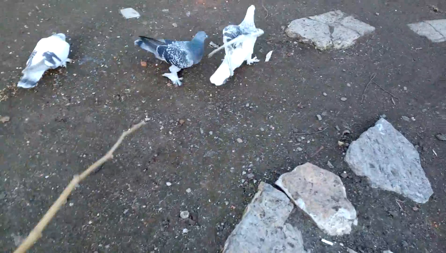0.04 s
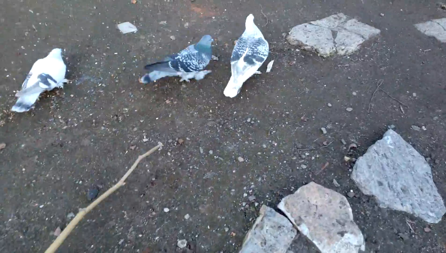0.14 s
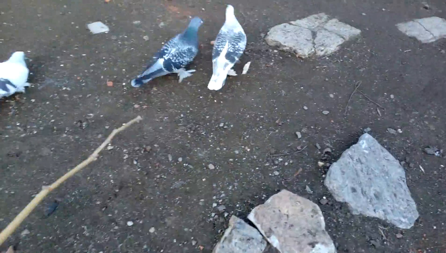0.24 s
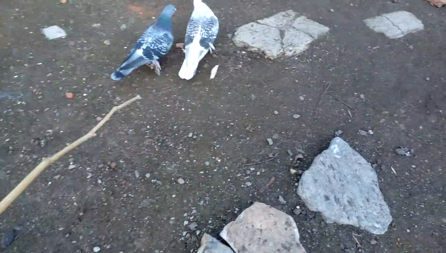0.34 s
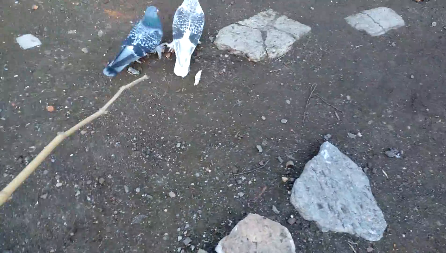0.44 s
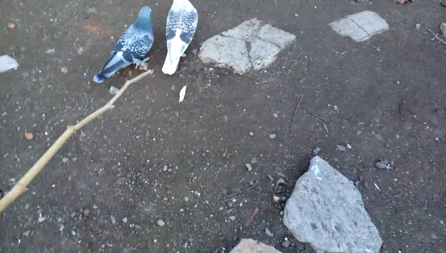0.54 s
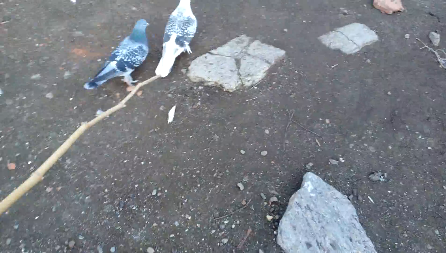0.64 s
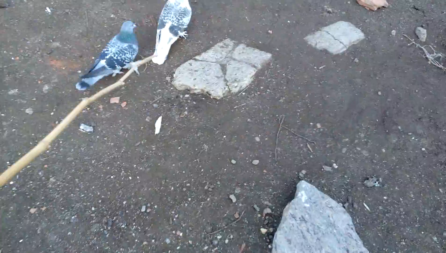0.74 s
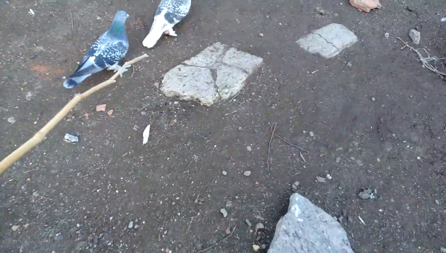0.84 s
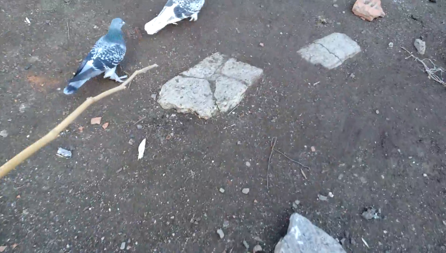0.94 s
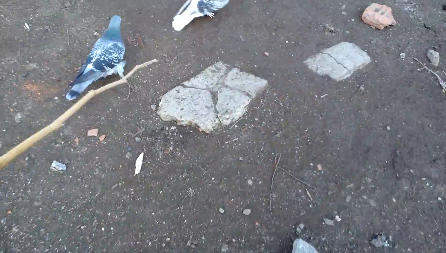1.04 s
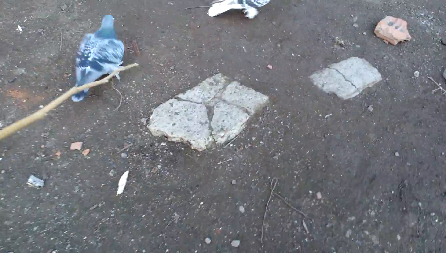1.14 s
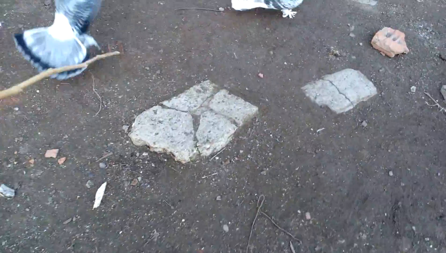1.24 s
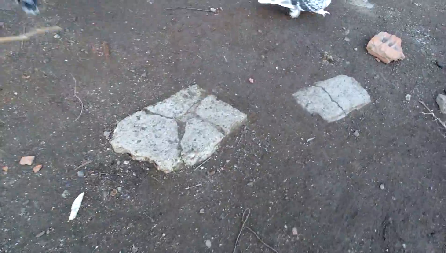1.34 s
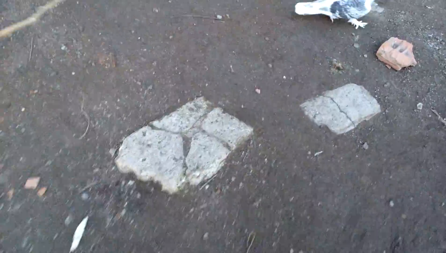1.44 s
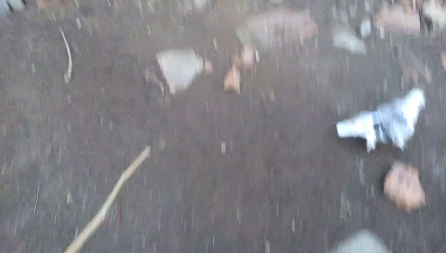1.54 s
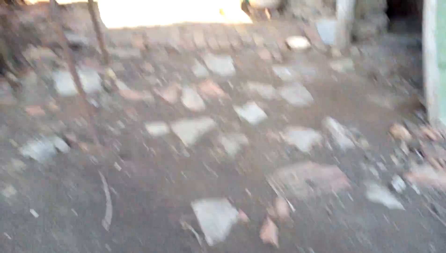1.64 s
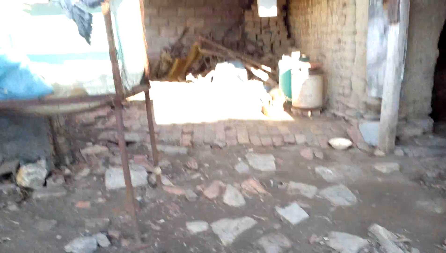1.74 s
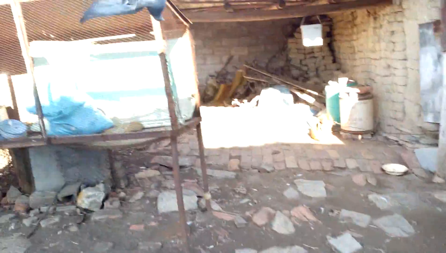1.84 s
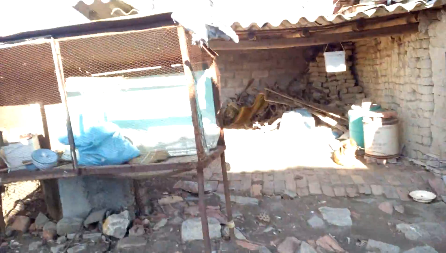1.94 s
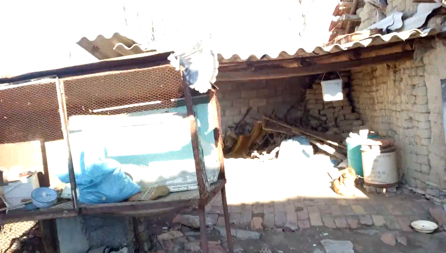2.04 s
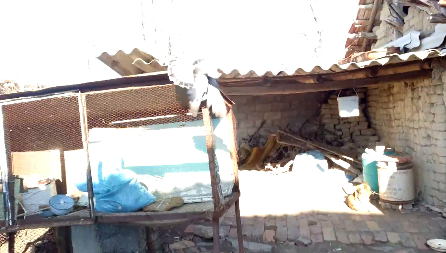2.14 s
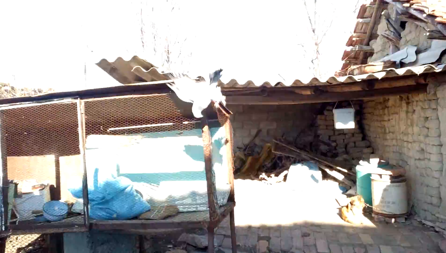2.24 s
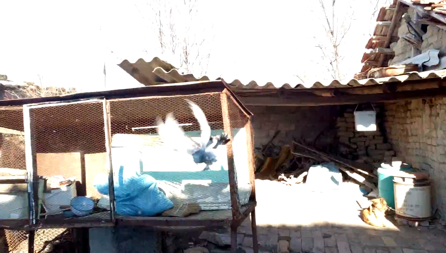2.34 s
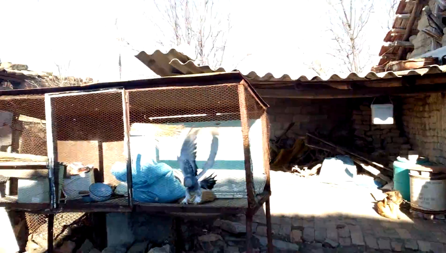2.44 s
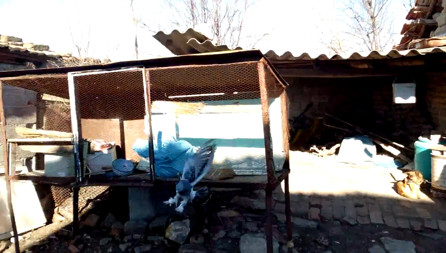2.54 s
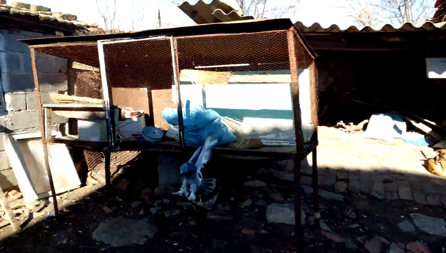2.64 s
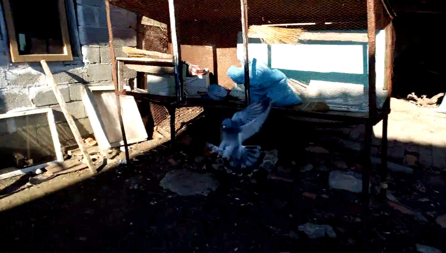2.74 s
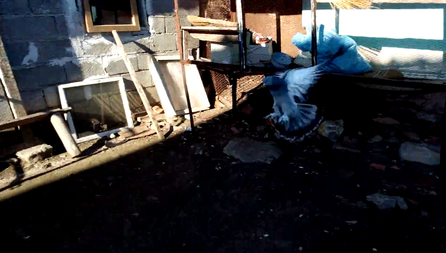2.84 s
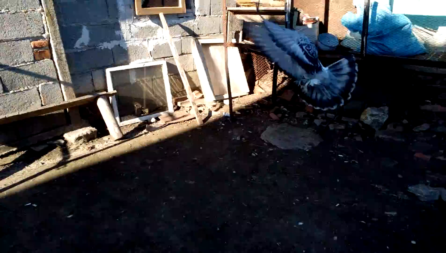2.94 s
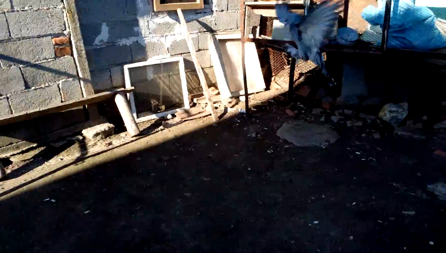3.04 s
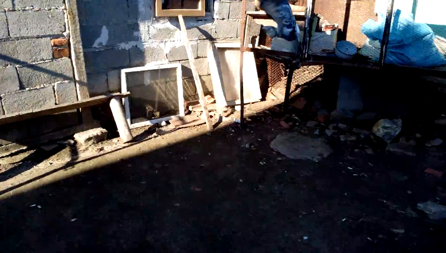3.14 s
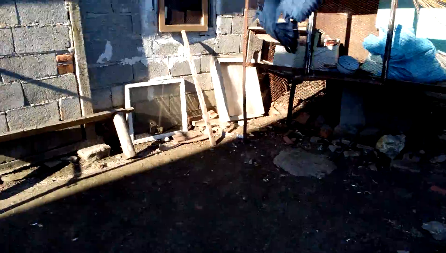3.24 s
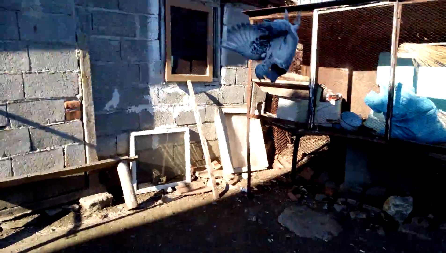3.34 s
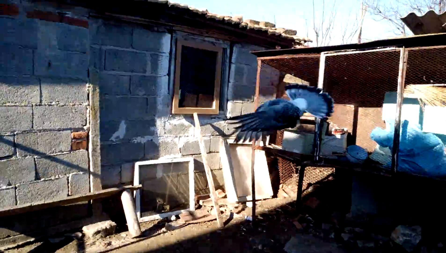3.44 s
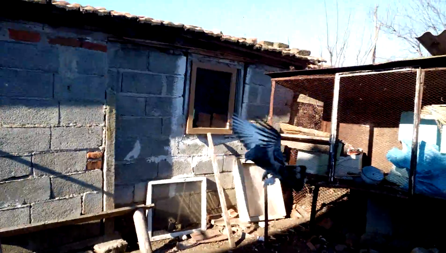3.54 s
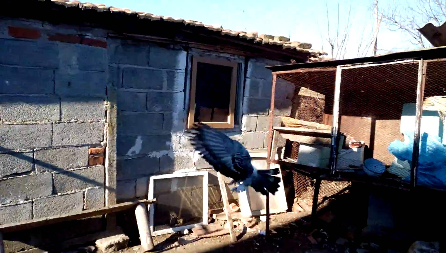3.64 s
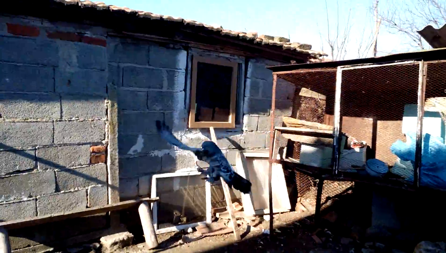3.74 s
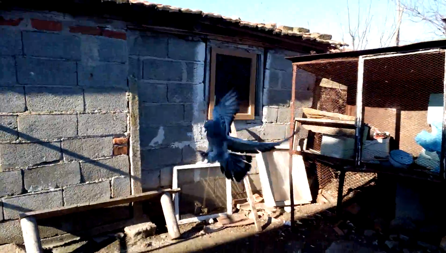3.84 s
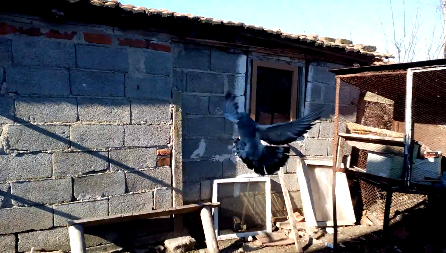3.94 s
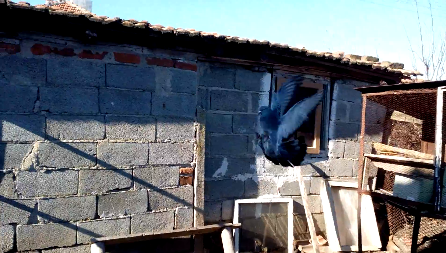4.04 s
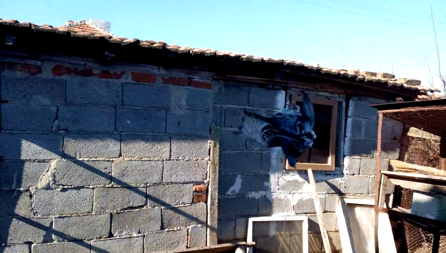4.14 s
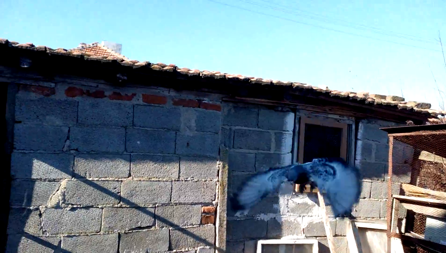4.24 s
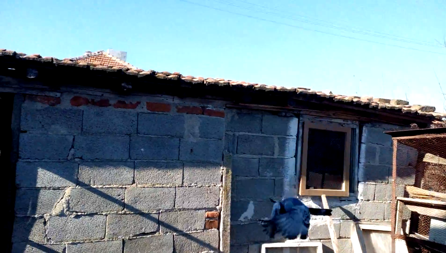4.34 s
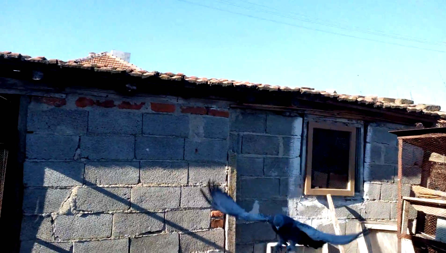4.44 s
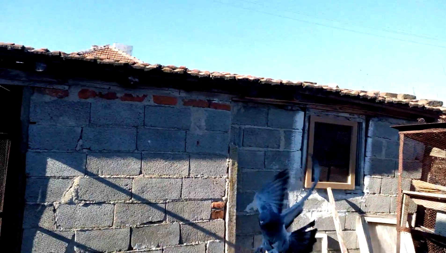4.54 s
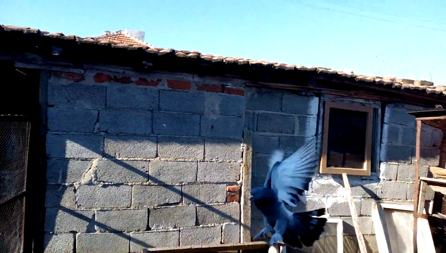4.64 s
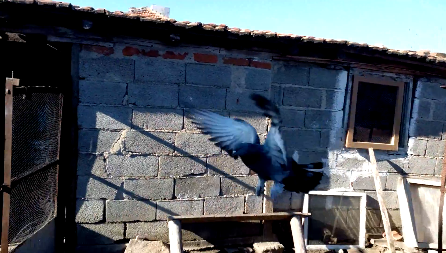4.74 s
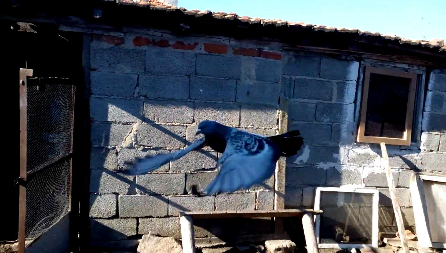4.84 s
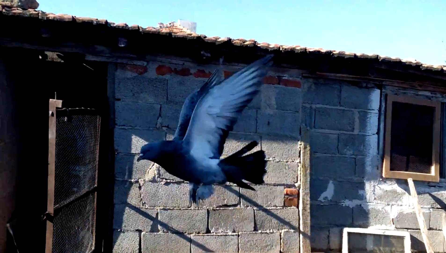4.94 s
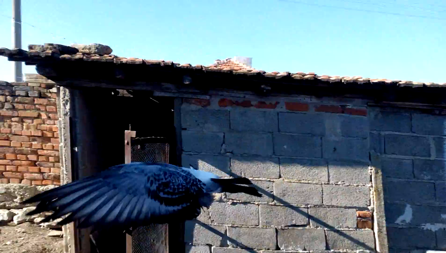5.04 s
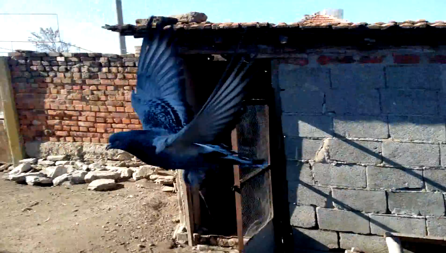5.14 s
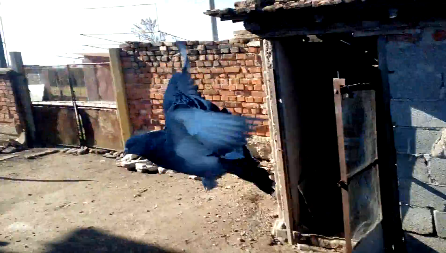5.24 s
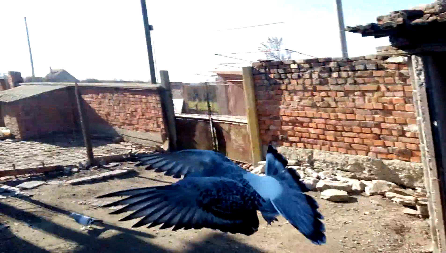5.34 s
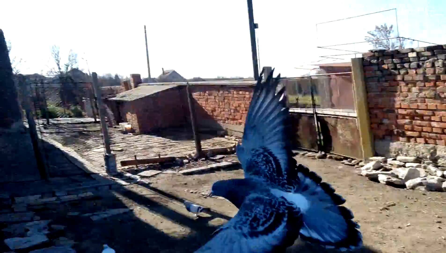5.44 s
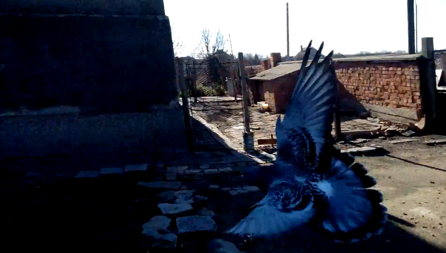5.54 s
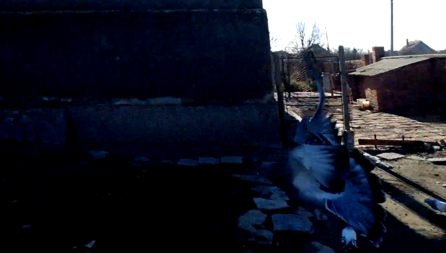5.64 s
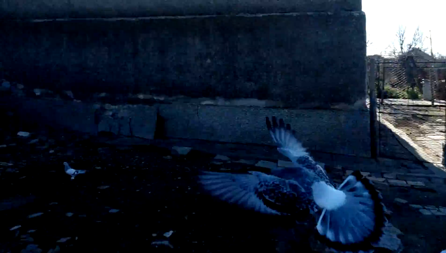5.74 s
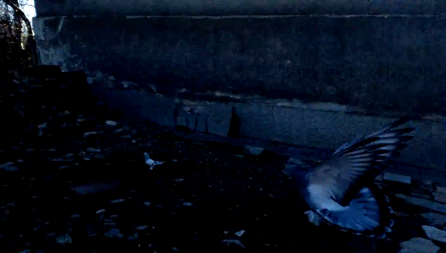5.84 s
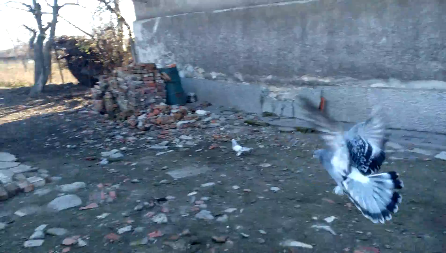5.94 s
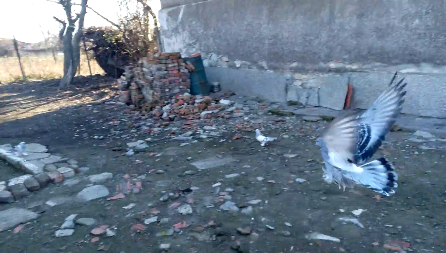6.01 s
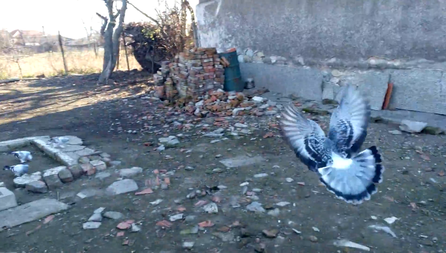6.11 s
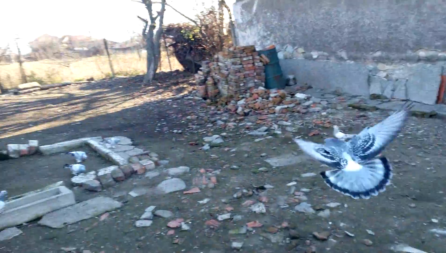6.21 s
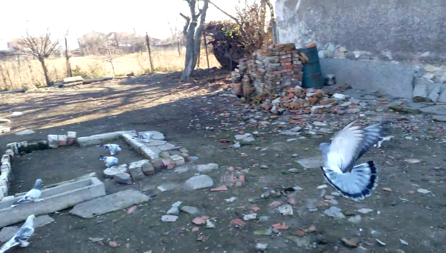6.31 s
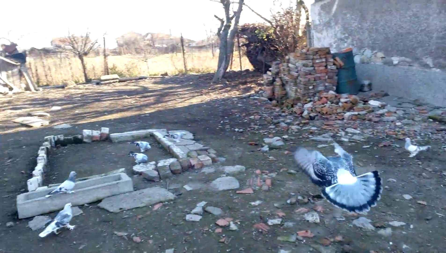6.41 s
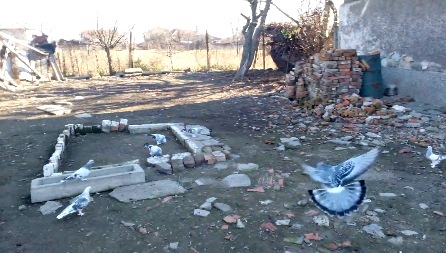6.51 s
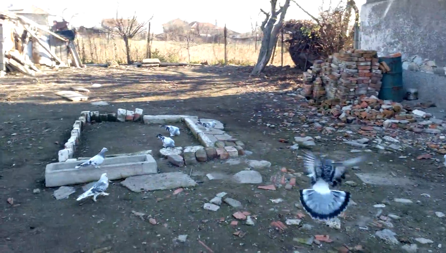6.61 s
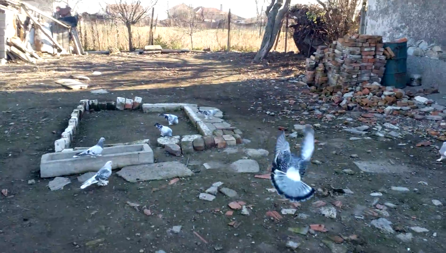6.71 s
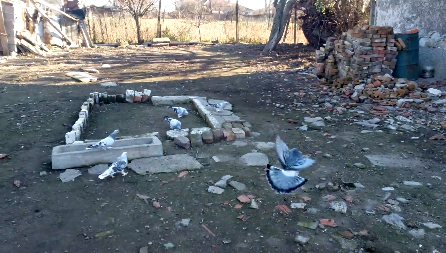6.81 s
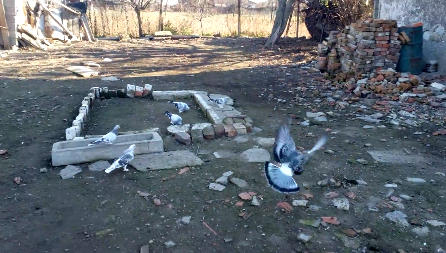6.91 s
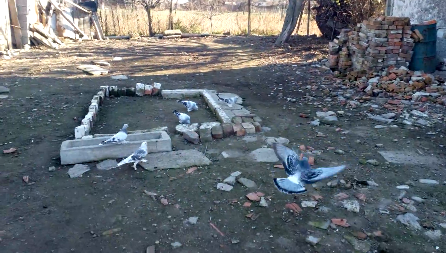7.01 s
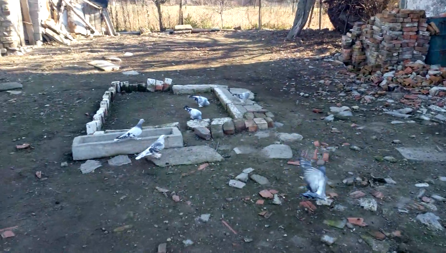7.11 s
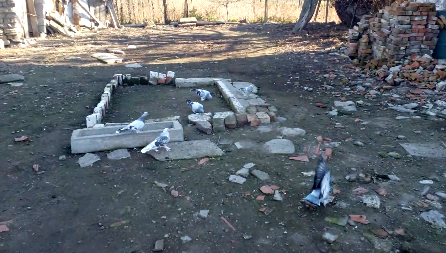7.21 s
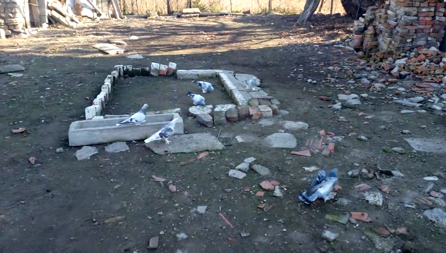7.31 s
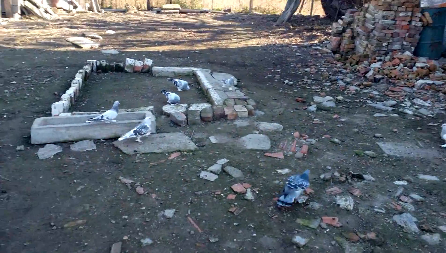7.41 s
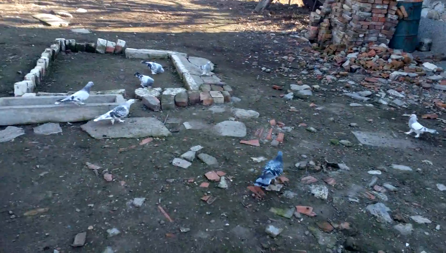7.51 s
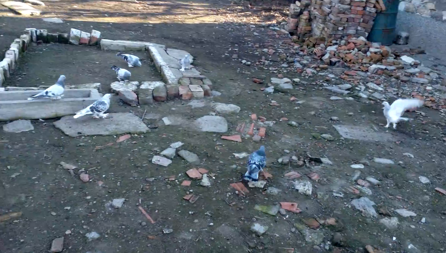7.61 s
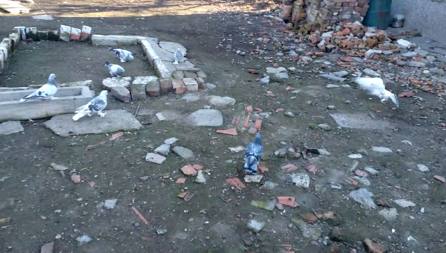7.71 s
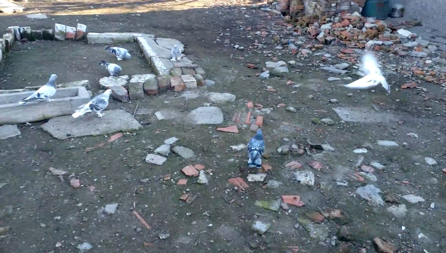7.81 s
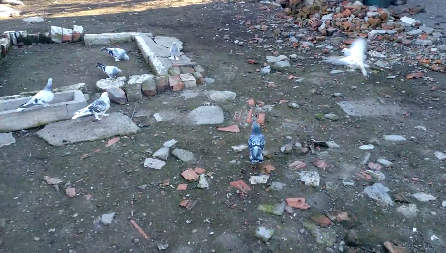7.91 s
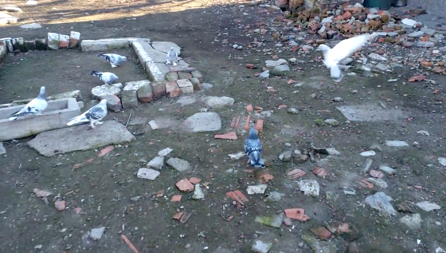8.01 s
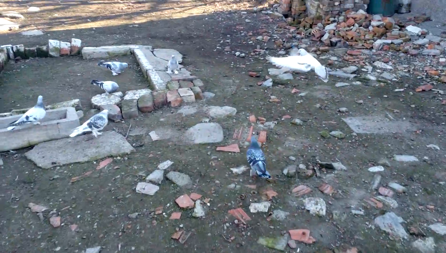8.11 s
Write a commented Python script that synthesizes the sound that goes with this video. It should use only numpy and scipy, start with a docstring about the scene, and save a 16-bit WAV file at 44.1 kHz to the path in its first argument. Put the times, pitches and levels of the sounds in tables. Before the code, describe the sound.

In a quiet dirt yard, low wind thumps hit the microphone while a few soft wing brushes stir. A pigeon takes off close by with a burst of crisp, rapid wing claps and feathery swishing, flaps on in steady beats, then brakes with faint, rough, pulsing feather whistles. A few small dry taps fall midway, and gusts return near the end.

```python
"""A pigeon takes off close by, flies nearer and farther and brakes to land, its wings clapping: bursts of noise.
Air swishes and whooshes through the feathers as shaped noise; the braking feathers whistle as rough, bent tones.
The place is a quiet dirt yard: the ground returns smeared echoes of the claps, the walls a short diffuse tail.
A few dry taps and faint treble ticks are heard. Gusts thump on the microphone, mostly on its left port:
rumble and pressure pushes."""
import sys
import numpy as np
from scipy import signal
from scipy.fft import rfft, irfft, next_fast_len
from scipy.io import wavfile
from scipy.ndimage import uniform_filter1d, map_coordinates

SR = 44100
rng = np.random.default_rng(int(sys.argv[2]) if len(sys.argv) > 2 else 0)


def transcribe(signal):
    """Save signal, clipped to [-1, 1], as a 16-bit WAV file at the path in sys.argv[1]."""
    frames = np.atleast_2d(signal).T
    limited = np.clip(frames, -1, 1)
    pcm = np.round(limited * 32767).astype(np.int16)
    wavfile.write(sys.argv[1], SR, pcm)


N = 360127

# quiet yard, spectrum: (frequency [Hz], density [dB])
YARD_COLOUR = [(30, -25), (60, 8.5), (330, 1.5), (700, -13.5), (1200, -9.5), (2300, -13), (4000, -39),
               (5500, -19), (10000, -27.5), (16000, -55)]
# diffuse tail of the walls: (frequency [Hz], time to fall 60 dB [s])
WALL_DECAY = [(200, 0.08), (1500, 0.19), (5000, 0.21), (12000, 0.2)]

# microphone ports, colour: (frequency [Hz], left minus right [dB])
PORT_BALANCE = [(100, 4.5), (600, 4), (1200, 1.5), (2300, -9.5), (3800, -3.5), (5200, -6), (7000, -6.5),
                (9000, -2), (12000, -4.5)]
# likeness of the two ports for sounds of the yard: (frequency [Hz], likeness [0 to 1])
PORT_LIKENESS = [(100, 0.99), (700, 1), (2000, 0.59), (5000, 0.26), (12000, 0.14)]
TOP_HZ = 16000  # band limit of the recorder

# light breeze between gusts: (time [s], buffet level [dB])
BREEZE = [(0, -89), (.4, -58), (.65, -45.5), (1.1, -51.5), (1.6, -45), (2.1, -51), (2.7, -42.5), (3.2, -51),
          (4.4, -51), (5.5, -56), (5.75, -40), (6.1, -45.5), (6.8, -39), (7.1, -52.5), (7.6, -40),
          (8.1, -47.5)]
# gusts: (start [s], length [s], level before the gust gain [dB], sharpness setting of their eddies [dB])
GUSTS = [(0.25, .04, -47.5, -18), (0.65, 0.12, -31, -17), (0.85, 0.085, -34, -48),
         (0.995, 0.022, -33.5, -42), (1.185, 0.065, -29, -18), (1.25, .085, -32.5, -25),
         (1.425, 0.25, -28, -18), (1.68, 0.26, -32.5, -11), (2.25, 0.062, -36, -11),
         (5.66, 0.053, -26, -35), (5.88, 0.116, -37.5, -28), (6.72, 0.2, -42.5, -28),
         (7.32, 0.071, -32, -28), (7.385, .3, -24, -16.5), (7.7, 0.24, -35.5, -45),
         (8.14, 0.013, -25.5, -21)]
# hardest eddies at the microphone: (time [s], peak before the eddy gain [dB], sharpness setting of the front [dB])
HARD_EDDIES = [(0.714, -18, -20), (0.856, -16, -56), (1.186, -10, -39), (1.205, -6.5, -21),
               (1.238, -10, -15), (1.57, -12.5, -11), (1.653, -14.5, -20), (1.842, -13, -33),
               (2.015, -11.5, -50), (5.665, -13.5, -42), (5.698, -14, -39), (6.739, -15.5, -10),
               (6.861, -14, -24), (7.396, -9, -24), (7.482, -7.5, -11), (7.497, -8.5, -13),
               (7.54, -4.5, -13.5), (7.64, -12.5, -18), (7.902, -13, -26.5), (8.157, -1, -21)]
# side on which the wind strikes: (time [s], left minus right gain [dB])
WIND_SIDE = [(0, 16), (.6, -11), (1.2, 16.5), (1.7, 8.5), (2.6, 1.5), (5.3, 4.5), (5.7, 11), (6.2, -10),
             (6.8, 0.5), (7.4, 11.5), (8.1, 9.5)]
# wind rumble, spectrum: (frequency [Hz], density [dB])
BUFFET_COLOUR = [(25, -61), (45, -23), (80, 1), (150, -2), (250, -9.5), (400, -24.5), (800, -37.5),
                 (2000, -56), (6000, -100)]
GUST_ATTACK_S, GUST_RELEASE_S = 0.0082, 0.01  # rise and decay constant of a gust
# lesser eddies: number per second, peak over the gust's listed level, random scatter
EDDY_RATE, EDDY_OVER_DB, EDDY_SPREAD_DB = 70, 5, 4

# small dry taps: (time [s], peak [dB])
TAPS = [(4.416, -26.5), (5.255, -20), (5.331, -28), (5.39, -29)]
# tap, spectrum: (frequency [Hz], level [dB])
TAP_COLOUR = [(60, 2), (300, 4.5), (900, -3.5), (1800, -6.5), (2800, -29), (8000, -52)]

# air through the wings, nearer and farther: (time [s], wing swish before gain [dB], feather rustle before gain [dB])
AIR = [(1.47, -35.5, -52), (1.6, -39.5, -48), (2.2, -45, -53.5), (2.79, -41, -47.5), (3.17, -45.5, -65.5),
       (3.61, -48, -59.5), (3.94, -44.5, -58), (4.47, -49, -58.5), (4.73, -44, -58), (5.29, -58, -59),
       (5.82, -48.5, -60), (6.29, -61, -66.5), (6.71, -52.5, -64.5), (7.12, -59, -64.5), (7.3, -57.5, -65)]
# wing swish, spectrum: (frequency [Hz], density [dB])
SWISH_COLOUR = [(80, -3), (200, -1), (450, 3.5), (900, 0.5), (1500, -5), (2300, -4), (3200, -28),
                (6000, -30.5), (12000, -44)]
# feather rustle, spectrum: (frequency [Hz], density [dB])
RUSTLE_COLOUR = [(1200, -3), (2500, 1), (4800, 0), (7000, -6.5), (8500, -20.5), (11000, -20),
                 (12500, -38.5), (16000, -36)]
SWISH_GAIN_DB, RUSTLE_GAIN_DB = -.5, 2
REST_SWISH_DB, REST_RUSTLE_DB = -62.5, -64.5  # birds stirring on the ground
SWISH_LUMPS_DB = 2.2  # chance swelling of the swish
DOWNSTROKE_LAG_S, STROKE_WIDTH_S = .052, .03  # clap to fastest downstroke, half length of its swell
# level over the listed wing swish, usual pitch, random scatter of the pitch in octaves
WHOOSH_DB, WHOOSH_HZ, WHOOSH_SPREAD_OCT = -7, 725, 0.44
FULL_STROKE_DB = -30  # claps listed above this open a full downstroke

# feather whistles, one per braking stroke: (time at the middle [s], level [dB], pitch setting [Hz])
WHISTLES = [(5.96, -42.5, 775), (6.12, -44, 727), (6.275, -47, 676), (6.45, -42, 743), (6.62, -43.5, 745),
            (6.77, -48, 757), (6.915, -45.5, 773), (7.09, -46, 776), (7.9, -48.5, 760), (8.03, -47.5, 734)]
# soft wing brushes and scuffles: (time [s], relative level [dB])
BRUSHES = [(0.252, -32.5), (0.288, -36), (0.333, -37.5), (0.712, -36.5), (0.794, -43), (1.754, -28),
           (2.065, -29), (2.245, -28), (2.278, -27.5), (2.606, -22.5), (2.733, -27), (3.644, -33.5),
           (4.263, -32), (5.609, -38), (5.8, -35.5), (6.344, -42), (6.529, -38.5), (6.712, -39.5),
           (7.845, -44.5)]
BRUSH_HISS_DB = -11.5  # a brush is duller than a clap

# wing claps, and a few faint treble ticks of the same burst shape (at 0.42, 6.345 and 6.44 s):
# (time [s], relative level [dB], contact time before widening [s])
CLAPS = [(0.42, -57, 0.0018), (0.6796, -44.5, 0.0026), (1.4174, -37.5, 0.0022), (1.4663, -27.5, 0.0016),
         (1.5108, -19, 0.0027), (1.5675, -25.5, 0.00086), (1.6094, -18.5, 0.0042), (1.7106, -20.5, 0.0039),
         (1.818, -28, 0.0049), (1.8828, -30.5, 0.0025), (1.9326, -26.5, 0.0045), (1.9806, -24, 0.0045),
         (1.995, -28, .0053), (2.1624, -30, 0.0061), (2.3038, -31, 0.0038), (2.3636, -33.5, 0.0073),
         (2.4701, -29, 0.0044), (2.534, -42.5, 0.0019), (2.572, -25, 0.0064), (2.6704, -22.5, 0.0054),
         (2.684, -26, 0.002), (2.7694, -18, 0.006), (2.872, -23.5, 0.0038), (2.937, -33.5, 0.0017),
         (2.974, -21.5, 0.0071), (3.0866, -21, 0.0036), (3.2134, -29, 0.0075), (3.3234, -28, .0041),
         (3.4395, -30, 0.0045), (3.485, -28.5, 0.0019), (3.7066, -29, 0.011), (3.771, -31.5, 0.003),
         (3.8114, -19, 0.0042), (3.9195, -18.5, 0.0077), (4.0365, -25, 0.008), (4.1527, -22.5, 0.0069),
         (4.3078, -31, 0.0037), (4.5333, -20.5, 0.0044), (4.6429, -22.5, .0049), (4.7583, -25.5, 0.0063),
         (4.874, -23.5, 0.0081), (5.0113, -23, 0.0057), (6.345, -51, 0.0042), (6.44, -52, 0.0033),
         (6.851, -36.5, 0.0036), (7.007, -43, 0.0027), (7.174, -38, 0.00072), (8.107, -48, 0.0069)]
# clap before its thud and hiss are weighted, spectrum: (frequency [Hz], density [dB])
CLAP_COLOUR = [(60, -4), (180, 4.5), (600, 4), (1100, 4.5), (1500, 0.5), (2250, 3.5), (2900, -3.5),
               (4800, 1.5), (7000, -4), (9000, -16.5), (12000, -25.5), (16000, -45)]
# colour of the early, near-ground claps, a dip at 1.5 kHz and a peak at 2.25 kHz: (frequency [Hz], gain [dB])
NEAR_GROUND_COLOUR = [(1100, 1), (1500, -8.5), (2250, 2.5), (2900, 1)]
LEAD_IN = .012  # seconds of wing-tip touch ahead of the clap
# a clap's colour follows its strength: a hard one is mostly crack, a soft one mostly air thud and feather hiss
USUAL_CLAP_DB = -26
THUD_DB, THUD_FALL = -3.5, 0.48  # thud of a usual clap, and its fall per dB of strength
HISS_DB, HISS_FALL = -5.5, 0.14  # the same for the hiss
TURNED_HISS_DB = -2.5  # change of the hiss once the bird has turned towards the listener
LOW_ECHO_DB, HIGH_ECHO_DB, ECHO_FALL = -19, -8, 0.15  # ground echo, bird low and aloft; fall per dB of strength
CLAP_SPREAD_DB = 1.2  # chance differences in colour from clap to clap

# flight [s]: take-off from the first stroke until clear of the ground, turn to the listener, sinking to land
TAKE_OFF_START, TAKE_OFF_END, TURN_START, LANDING_START = 1.42, 2.0, 3.05, 5.5


def amp(db):
    """Decibels to gain."""
    return 10 ** (np.asarray(db) / 20)


def unit(x):
    """Scale to rms 1."""
    return x / np.sqrt(np.mean(x ** 2) + 1e-20)


def along(points, hz):
    """Interpolate (Hz, value) points on a log frequency axis."""
    f, v = np.transpose(points)
    return np.interp(np.log(hz + 1), np.log(f + 1), v)


def curves(rows):
    """One value per sample for each column after the time."""
    s, *cols = np.transpose(rows)
    return [np.interp(np.arange(N) / SR, s, c) for c in cols]


def wobble(rate, size=N):
    """A smooth random curve, rate knots a second."""
    knots = rng.standard_normal(int(size * rate / SR) + 4)
    return map_coordinates(knots, [np.arange(size) * rate / SR])


def add(track, s, sound):
    """Mix a sound into a track from time s on."""
    start = int(np.clip(round(s * SR), 0, N - 1))
    track[..., start:start + sound.shape[-1]] += sound[..., :N - start]


def filtered(x, response):
    """Filter x by a complex response of frequency."""
    m = next_fast_len(N + SR // 2)
    return irfft(rfft(x, m) * response(np.fft.rfftfreq(m, 1 / SR)), m)[..., :N]


def struck(x, colour_db):
    """Give a short burst a causal (minimum-phase) colour, so that nothing sounds before its attack."""
    size = x.shape[-1]
    cepstrum = irfft(np.log(amp(colour_db(np.fft.rfftfreq(size, 1 / SR))) + 1e-6), size)
    cepstrum[1:size // 2] *= 2
    cepstrum[size // 2 + 1:] = 0
    return irfft(rfft(x) * np.exp(rfft(cepstrum)), size)


def likeness_angle(alike, hz):
    """Mid-side angle; the cosine of twice this angle is the left-right likeness."""
    return np.arccos(np.clip(along(alike, hz), -1, 1)) / 2


def rush(colour, alike, patchy_db=0):
    """Stereo noise of rms 1 with a given spectrum, left-right likeness and brief patches of random gain."""
    z = signal.stft(rng.standard_normal((2, N)), nperseg=512)[2]
    field = uniform_filter1d(rng.standard_normal(z.shape[1:]), size=3, axis=0)
    field = uniform_filter1d(field, size=5, axis=1)
    pair = signal.istft(z * amp(patchy_db * unit(field)), nperseg=512)[1][:, :N]

    def response(hz):
        turn = likeness_angle(alike, hz)
        return amp(along(colour, hz)) * [np.cos(turn), np.sin(turn)]
    mid, side = filtered(pair, response)
    return unit(np.array([mid + side, mid - side]))


def quiet_yard():
    """The steady hush of the place: coloured noise, less alike on the two ports in the treble."""
    return amp(-56.5) * rush(YARD_COLOUR, PORT_LIKENESS)


def walls(x):
    """Diffuse answer of sheds and walls after 12.5 ms: noise whose decay follows the wall table."""
    hz, t, z = signal.stft(rng.standard_normal((2, SR // 2)), SR, nperseg=256)
    decay_s = np.maximum(along(WALL_DECAY, hz), .02)[:, None]
    tail = signal.istft(z * amp(-60 * t / decay_s), SR, nperseg=256)[1]
    delayed = np.pad(x, ((0, 0), (SR // 80, 0)))
    return signal.fftconvolve(delayed, tail / np.linalg.norm(tail[0]), axes=1)[:, :N]


def gusts():
    """Buffet level over time in dB: each gust rises fast, holds and dies away."""
    t, power = np.arange(N) / SR, np.zeros(N)
    for s, length, db, _ in GUSTS:
        rise = np.clip((t - s) / GUST_ATTACK_S + 1, 0, 1)
        decay = np.exp(-np.maximum(t - s - length, 0) / GUST_RELEASE_S)
        power = np.maximum(power, (amp(db) * rise * decay) ** 2)
    return 10 * np.log10(power + 1e-20)


def lesser_eddies(count=64):
    """Every gust breaks up into small eddies at uneven times: rows like those of the hardest eddies."""
    rows = []
    for s, length, db, edge_db in GUSTS:
        delays = (np.arange(count) + rng.random(count)) / EDDY_RATE
        levels = db + EDDY_OVER_DB + EDDY_SPREAD_DB * rng.standard_normal(count)
        rows += [(s + delay, level, edge_db) for delay, level in zip(delays, levels) if delay < length]
    return rows


def eddies(wake=0.065, wake_time=0.0079, edge_hz=760, size=4096):
    """Each eddy is an abrupt pressure push with a short ragged wake; a steeper front reaches higher."""
    out, t = np.zeros(N), np.arange(size) / SR
    body = [(20, -42), (50, -7.5), (90, 2.0), (200, 4.5), (500, -0.5)]  # (Hz, dB)
    for s, db, edge_db in list(HARD_EDDIES) + lesser_eddies():
        hit = signal.unit_impulse(size) + wake * rng.standard_normal(size) * np.exp(-t / wake_time)
        slope_db = min(edge_db - 1.0, -11)
        push = struck(hit, lambda hz: along(body, hz) + slope_db * (hz / edge_hz) ** 1.58)
        add(out, s - .002, amp(db) * push / np.abs(push).max())
    return out


def wind(lumps_db=4.0, gust_gain_db=-2, eddy_gain_db=-5.0):
    """Turbulence on the ports comes in lumps; of each push the sheltered right port hears the slower swings."""
    breeze_db, = curves(BREEZE)
    side_db, = curves(WIND_SIDE)
    flow = np.hypot(amp(breeze_db), amp(gusts() + gust_gain_db))
    buffet = rush(BUFFET_COLOUR, [(60, 0.94), (400, 0.16)])  # (Hz, likeness)
    rumble = flow * amp(lumps_db * wobble(50)) * buffet
    pushes = amp(eddy_gain_db) * eddies()
    sheltered = filtered(pushes, lambda hz: 1 / (1 + 1j * hz / 500))
    gains = amp(np.array([side_db, -side_db]) / 2)
    return (rumble + np.array([pushes, sheltered])) * gains / gains.mean(axis=0)


def taps(size=1024):
    """Small dry knocks without any ring: coloured impulses."""
    out = np.zeros(N)
    tap = struck(signal.unit_impulse(size), lambda hz: along(TAP_COLOUR, hz))
    for s, db in TAPS:
        add(out, s, amp(db) * tap / np.abs(tap).max())
    return out


def swish(swish_stroke_db=3.5, rustle_stroke_db=1.0):
    """Air pours through the feathers, strongest in the downstroke that follows a clap or carries a whistle."""
    swish_db, rustle_db = curves(AIR)
    t = np.arange(N) / SR
    # folded wings move little air
    swish_db = np.where(t < TAKE_OFF_START, REST_SWISH_DB, swish_db + SWISH_GAIN_DB)
    rustle_db = np.where(t < TAKE_OFF_START, REST_RUSTLE_DB, rustle_db + RUSTLE_GAIN_DB)
    after_claps = [row[0] + DOWNSTROKE_LAG_S for row in CLAPS if row[0] < LANDING_START]
    strokes = np.sort(after_claps + [row[0] for row in WHISTLES])
    nearest = np.searchsorted((strokes[1:] + strokes[:-1]) / 2, t)
    stroke = np.exp(-((t - strokes[nearest]) / STROKE_WIDTH_S) ** 2)
    swish_db = swish_db + swish_stroke_db * stroke + SWISH_LUMPS_DB * wobble(45) + 2.8 * wobble(300)
    rustle_db = rustle_db + rustle_stroke_db * stroke + 2.0 * wobble(20) + 2.3 * wobble(600)
    wing_air = amp(swish_db) * rush(SWISH_COLOUR, PORT_LIKENESS, patchy_db=3.0)
    return wing_air + amp(rustle_db) * rush(RUSTLE_COLOUR, PORT_LIKENESS, patchy_db=1.5)


def whooshes(half_length=0.01703, fall=0.0895, size=4096):
    """Each full downstroke sheds vortices from the wing edge: a skirted noise band that sinks as it slows."""
    out = np.zeros(N)
    u = (np.arange(size) - size / 2) / SR / half_length
    swish_db, _ = curves(AIR)
    for (s, db, _), chance in zip(CLAPS, rng.standard_normal(len(CLAPS))):
        if db <= FULL_STROKE_DB:
            continue
        pitch = WHOOSH_HZ * 2 ** (WHOOSH_SPREAD_OCT * chance) * np.exp(-fall * u)
        phase = 2 * np.pi * np.cumsum(pitch) / SR
        core = wobble(179, size) + 1j * wobble(182, size)
        skirt = 0.2 * (wobble(1017, size) + 1j * wobble(993, size))
        whoosh = unit(np.exp(-u ** 2) * np.real((core + skirt) * np.exp(1j * phase)))
        level_db = swish_db[round(s * SR)] + WHOOSH_DB
        add(out, s + DOWNSTROKE_LAG_S - size / 2 / SR, amp(level_db) * whoosh)
    return out


def whistles(half_length=0.0163, sag=0.0715, rise=0.0315, size=4096):
    """A fluttering wing-tip feather: a rough, airy tone that rises and bends with the speed of the stroke."""
    out = np.zeros(N)
    u = (np.arange(size) - size / 2) / SR / half_length
    for s, db, hz in WHISTLES:
        bend = sag * (1 - np.exp(-u ** 2 / 2))
        pitch = hz * (1 - bend + rise * rng.uniform(0.55, 1.57) * np.tanh(u))
        phase = 2 * np.pi * np.cumsum(pitch) / SR
        tone = 0
        for k, partial_db in enumerate([5.0, 0, 1, -7.5, -6], 1):
            flutter = 1 + .62 * (wobble(280, size) + 1j * wobble(280, size))
            tone = tone + amp(partial_db + rng.normal(0, 1.4)) * np.real(flutter * np.exp(1j * k * phase))
        add(out, s - size / 2 / SR, amp(db) * np.exp(-u ** 2) * unit(tone))
    return out


def feather_burst(length, thud_db, hiss_db, spiky_db, touch=0.14, touch_time=0.0044, size=4096):
    """Wing tips touch, then many quills slap within a short time; stereo, unit energy in the crack band."""
    t = np.arange(size) / SR - LEAD_IN
    after, length = np.maximum(t, 0), max(length, 1 / 2000)
    decay = np.exp(-(after / length) ** 2) + 0.033 * np.exp(-after / length / 2)
    shape = (1 - np.exp(-after / 0.00047)) * decay + touch * np.exp(-np.abs(t) / touch_time)
    # each port sees the spread wing from its own angle, so the treble differs between them
    turn = likeness_angle(PORT_LIKENESS, np.fft.rfftfreq(size, 1 / SR))
    mid, side = irfft(rfft(rng.standard_normal((2, size))) * [np.cos(turn), np.sin(turn)], size)
    slaps = shape * np.array([mid + side, mid - side]) * amp(spiky_db * wobble(2492, size))
    tilt = [(600, thud_db), (1300, 0), (3200, 0), (4800, hiss_db)]  # (Hz, dB)
    burst = struck(slaps, lambda hz: along(CLAP_COLOUR, hz) + along(tilt, hz))
    crack = signal.sosfilt(signal.butter(2, [1200, 3500], "band", fs=SR, output="sos"), burst)
    return burst / np.linalg.norm(crack)


def brushes(gain_db=21):
    """Wings graze each other or the dirt without a full clap: longer, duller feather bursts."""
    out = np.zeros((2, N))
    for s, db in BRUSHES:
        graze = feather_burst(0.024, 6.0, BRUSH_HISS_DB, spiky_db=4, touch=0.58, touch_time=0.0056)
        add(out, s - LEAD_IN, amp(db + gain_db) * graze)
    return out


def claps(gain_db=30, echo_delay=.0105):
    """The wings meet above the back and the rough ground returns a smeared copy; faint ticks share the shape."""
    out = np.zeros((2, N))
    chances = CLAP_SPREAD_DB * rng.standard_normal((len(CLAPS), 2))
    for (s, db, contact), (thud_chance, hiss_chance) in zip(CLAPS, chances):
        force_db = db - USUAL_CLAP_DB
        thud_db = THUD_DB - THUD_FALL * force_db + thud_chance
        hiss_db = HISS_DB - HISS_FALL * force_db + TURNED_HISS_DB * (s > TURN_START) + hiss_chance
        aloft = TAKE_OFF_END < s < LANDING_START
        echo_db = (HIGH_ECHO_DB if aloft else LOW_ECHO_DB) - ECHO_FALL * force_db
        clap = feather_burst(1.62 * contact, thud_db, hiss_db, spiky_db=3.0)
        if s < TAKE_OFF_END:
            clap = struck(clap, lambda hz: along(NEAR_GROUND_COLOUR, hz))
        echo = feather_burst(0.0094, thud_db - 4.5, hiss_db + .5, spiky_db=1.5)
        add(out, s - LEAD_IN, amp(db + gain_db) * clap)
        add(out, s - LEAD_IN + echo_delay, amp(db + gain_db + echo_db) * echo)
    return out


def ports(x, lead=.00009):
    """The microphone housing colours each port differently; sound reaches the left one slightly earlier."""
    sides = np.array([[1], [-1]])

    def response(hz):
        gains = amp(sides * along(PORT_BALANCE, hz) / 2)
        level = gains / np.sqrt(np.mean(gains ** 2, axis=0))
        return level * np.exp(1j * np.pi * sides * hz * lead)
    return filtered(x, response)


def scene():
    """The yard, taps and birds with their echoes through the ports, and the wind on the microphone."""
    wings = claps() + brushes() + whistles() + whooshes()
    birds = wings + amp(-16.5) * walls(wings) + swish()
    return ports(birds + taps() + quiet_yard()) + wind()


def record(dry, bass_hz=28):
    """The recorder drops the deepest bass and keeps nothing above its band limit; the end fades briefly."""
    fade = np.minimum(1, np.arange(N)[::-1] / 128)
    return filtered(dry * fade, lambda hz: (hz < TOP_HZ) * (1j * hz / (bass_hz + 1j * hz)) ** 2)


dry = scene()
out = record(dry)
transcribe(out)
```